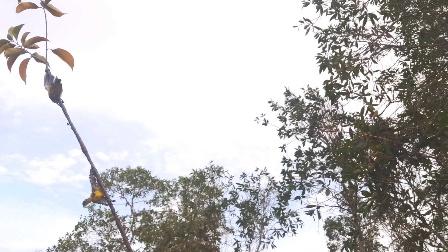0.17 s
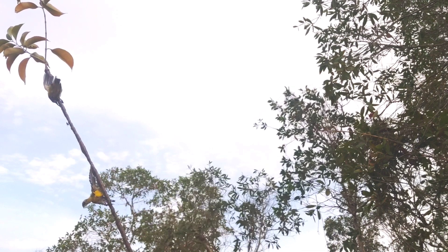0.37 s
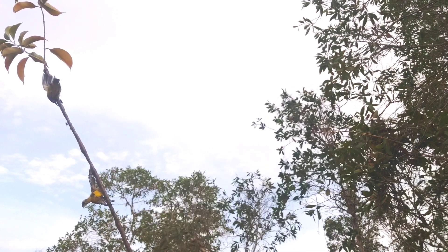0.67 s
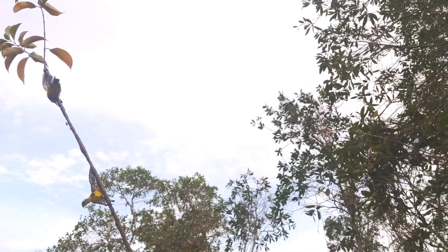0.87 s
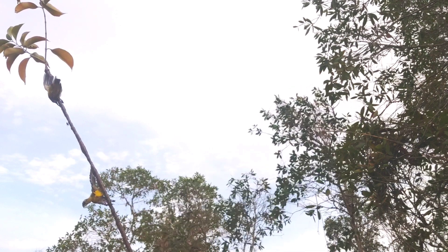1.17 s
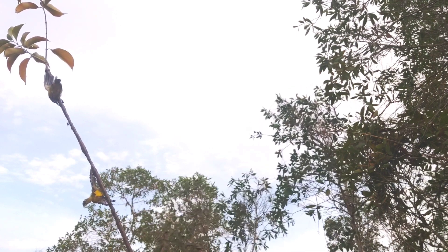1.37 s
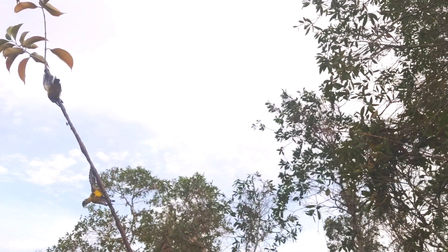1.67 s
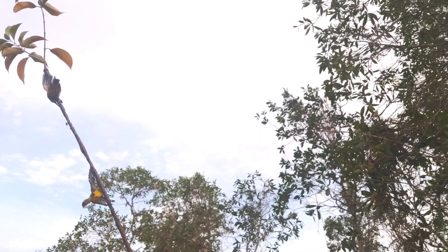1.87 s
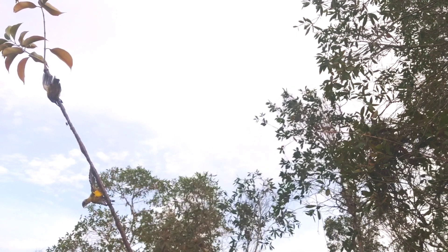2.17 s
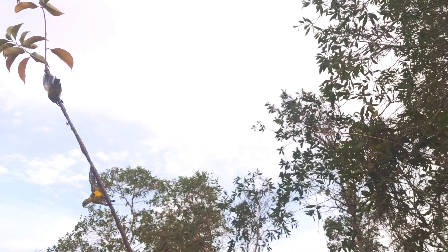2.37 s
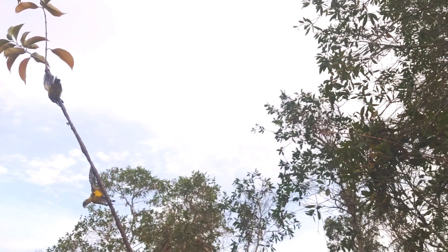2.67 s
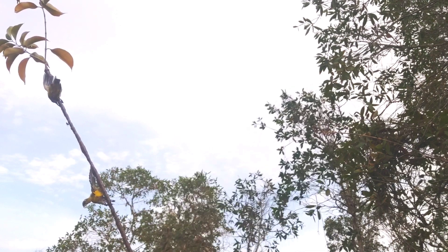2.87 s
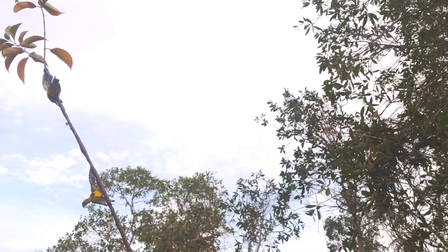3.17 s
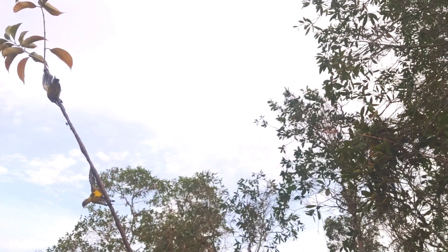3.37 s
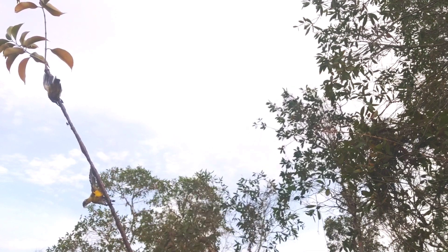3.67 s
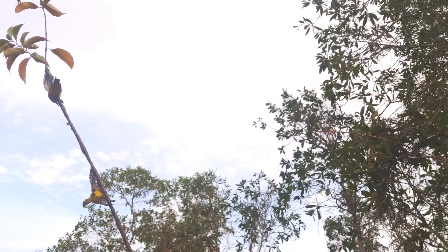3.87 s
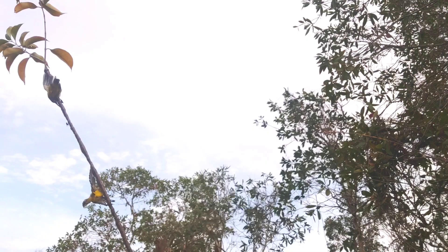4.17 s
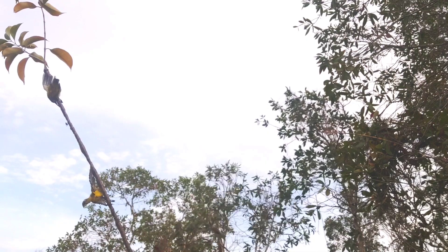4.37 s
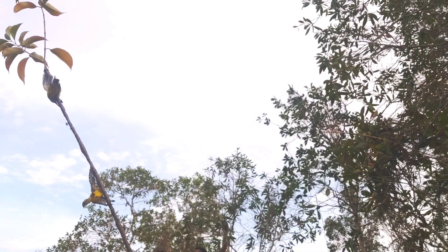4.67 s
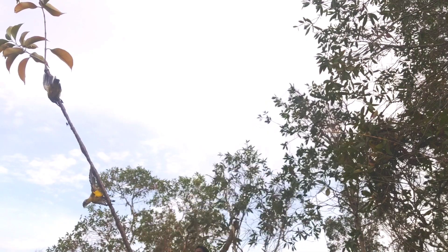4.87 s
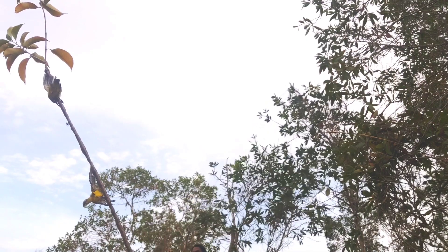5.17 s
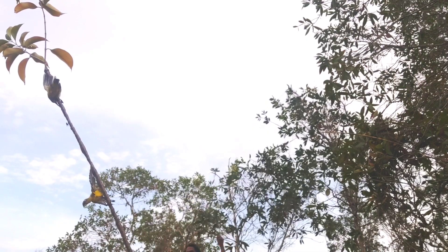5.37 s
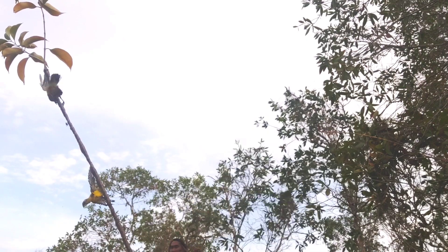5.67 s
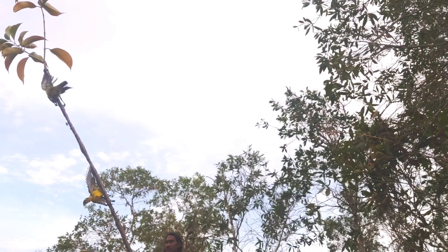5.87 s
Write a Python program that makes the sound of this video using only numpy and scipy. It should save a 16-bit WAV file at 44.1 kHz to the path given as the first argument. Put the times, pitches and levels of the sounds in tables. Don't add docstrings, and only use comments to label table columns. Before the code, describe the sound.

At a wood's edge, a single-cylinder motor revs briefly then drops to a soft low flutter, amid insect chirring, bird chips and snapping twigs.

```python
import sys
import numpy as np
from scipy import signal
from scipy.fft import rfft, irfft, next_fast_len
from scipy.io import wavfile
from scipy.ndimage import uniform_filter1d

SR = 44100
rng = np.random.default_rng(int(sys.argv[2]) if len(sys.argv) > 2 else 0)


def put_to_file(sound):
    columns = np.atleast_2d(sound).T
    safe = np.clip(columns, -1, 1)
    whole_steps = np.round(safe * 32767)
    wavfile.write(sys.argv[1], SR, whole_steps.astype(np.int16))


def invert_db(x):
    u = np.asarray(x, float) / 20
    return 10 ** u


N = 265967


def evened(x):
    return x / np.sqrt(np.mean(x ** 2) + 1e-20)


def read(points, hz):
    f, value = np.transpose(points)
    return np.interp(np.log(hz + 1), np.log(f + 1), value)


def curve(rows, column, t):
    rows = np.array(rows)
    return np.interp(t, rows[:, 0], rows[:, column])


def add(mix, s, sound):
    part = mix[..., max(round(s * SR), 0):][..., :sound.shape[-1]]
    part += sound[..., :part.shape[-1]]


def delayed(x, count):
    return np.roll(x, count, axis=-1)


def resonate(x, hz, width_hz):
    r = np.exp(-np.pi * width_hz / SR)
    return signal.lfilter([1 - r], [1, -2 * r * np.cos(2 * np.pi * hz / SR), r * r], x)


def wander(per_s):
    knots = rng.standard_normal(400)
    return np.interp(np.arange(N) / SR * per_s, np.arange(400), knots)


def coloured(x, spectrum):
    size = next_fast_len(N)
    gain = invert_db(read(spectrum, np.fft.rfftfreq(size, 1 / SR)))
    return irfft(rfft(x, size) * gain, size)[..., :N]


def beats(runs):
    return np.array([(s, db) for first, last, period, db in runs
                     for s in np.arange(first, last + period / 2, period)])


# (frequency [Hz], decay by 60 dB [s])
TRUNK_DECAY = [(3000, 0.74), (8000, 0.23)]


def echoes(x, wet_db):
    taps = rng.choice([-1., 1.], (2, SR // 2)) * (rng.random((2, SR // 2)) < .05)
    hz, t, z = signal.stft(taps, SR, nperseg=256)
    decay = invert_db(-60 * t / read(TRUNK_DECAY, hz)[:, None])
    tail = signal.istft(z * decay, SR, nperseg=256)[1]
    tail[:, :300] = 0
    return invert_db(wet_db) * signal.fftconvolve(x[None], tail / np.linalg.norm(tail[0]), axes=1)[:, :N]


# (frequency [Hz], level [dB per Hz])
AIR_COLOUR = [(18, -8.5), (35, -3.5), (65, -0.5), (110, -4.5), (170, -10), (280, -18), (450, -24.5),
              (650, -36.5), (1000, -45), (2500, -35), (4200, -36), (7000, -47), (11000, -39), (15000, -41)]
# (frequency [Hz], left minus right [dB])
AIR_LEAN = [(3000, -.5), (5000, 0), (7000, -4), (11000, -1.5)]
# (frequency [Hz], correlation [1])
AIR_LIKENESS = [(60, 1), (130, 0.94), (250, 0.9), (450, 0.56), (750, 0.33), (1200, .01), (15000, 0.0099)]
# (time [s], level [dB])
TRAFFIC_SWELL = [(0, -55), (.59, -53), (1.39, -54.5), (2.37, -52), (3.44, -55.5), (3.81, -54),
                 (4.21, -55.5), (5.44, -54), (6.03, -53.5)]


def air(level_db=-51.5, patchy_db=0.82):
    frames, hz = N // 256 + 5, np.fft.rfftfreq(1024, 1 / SR)
    a, b, c, d, patches = rng.standard_normal((frames, 513, 5)).T
    patches = evened(uniform_filter1d(uniform_filter1d(patches, size=10, axis=0), size=12, axis=1))
    same = np.clip(read(AIR_LIKENESS, hz), -1, 1)[:, None]
    left = a + 1j * b
    right = same * left + np.sqrt(1 - same ** 2) * (c + 1j * d)
    lean_db = read(AIR_LEAN, hz)[:, None] / 2
    z = np.array([left * invert_db(lean_db), right * invert_db(-lean_db)])
    traffic_db = curve(TRAFFIC_SWELL, 1, (np.arange(frames) - 2) * 256 / SR + 512 / SR)
    bass = 1 / (1 + (hz[:, None] / 350) ** 2)
    swell_db = bass * (traffic_db - traffic_db.mean())
    z *= invert_db(read(AIR_COLOUR, hz)[:, None] + patchy_db * patches + swell_db)
    return invert_db(level_db) * evened(signal.istft(z, nperseg=1024, noverlap=768)[1][:, :N])


# (pitch [Hz], width [Hz], left level [dB], right level [dB], throbs [per s])
CICADA_VOICES = [(7465, 170, -72.5, -63, 14), (7800, 760, -66, -63, 18), (8840, 670, -66.5, -64, 10),
                 (9280, 970, -64, -65, 5.2), (5400, 670, -73.5, -70, 14), (6400, 2300, -74.5, -71, 28)]
# (time [s], level [dB])
CHORUS_SWELL = [(0.0, -62), (0.47, -61.5), (1.44, -62), (2.01, -60.5), (2.4, -61), (4.2, -60), (5.19, -60),
                (5.46, -60.5), (5.66, -60.5), (6.03, -59.5)]


def cicadas(clicks_per_s=2500, spread_db=0.5, throb_db=1.0, drift_db=2.0):
    t, out = np.arange(N) / SR, np.zeros((2, N))
    for hz, width_hz, left_db, right_db, per_s in CICADA_VOICES:
        clicks = (rng.random((2, N)) < clicks_per_s / SR) * invert_db(spread_db * rng.exponential(1, (2, N)))
        ring = resonate(resonate(clicks - clicks.mean(), hz, width_hz), hz, width_hz)
        throb = np.sin(2 * np.pi * per_s * t + wander(3.6))
        sides_db = np.array([[left_db], [right_db]])
        out += evened(ring) * invert_db(sides_db + throb_db * throb + drift_db * wander(4.83))
    level_db = curve(CHORUS_SWELL, 1, t)
    return out * invert_db(level_db - level_db.mean())


# (middle [s], half length [s], rustle level [dB], scuff against it [dB])
LEAF_STIRS = [(.04, .1, -68.5, -16), (.32, .11, -67.5, -22), (.62, .17, -70.5, -16), (.91, .06, -71, -10),
              (1.2, .17, -69, -10), (1.8, .3, -76, -13), (2.2, .03, -65, -19), (2.69, .02, -73, -25),
              (2.76, .018, -70, -19), (3.92, .07, -65.5, -16), (4.05, .07, -62.5, -21),
              (4.28, .16, -71, -16), (4.97, .13, -71, -18), (5.86, .2, -65.5, -19), (5.37, .19, -62.5, -19),
              (5.6, .06, -56.5, -17)]


def stirring(t, blunt=3.1, calm_db=-76, calm_scuff_db=-13):
    rustle, scuff = invert_db(calm_db) ** 2, invert_db(calm_db + calm_scuff_db) ** 2
    for s, half, db, scuff_db in LEAF_STIRS:
        swell = invert_db(db) ** 2 * np.exp(-abs((t - s) / half) ** blunt)
        rustle = rustle + swell
        scuff = scuff + swell * invert_db(scuff_db) ** 2
    return 10 * np.log10(rustle), 10 * np.log10(scuff / rustle)


# (frequency [Hz], level [dB])
CRACKLE_LEFT = [(3000, -21.5), (4700, -11.5), (5600, -13.5), (7000, -20), (9500, -8.5), (12500, -6),
                (15000, -8.5)]
# (frequency [Hz], level [dB])
CRACKLE_RIGHT = [(3000, -19), (4700, -10), (5600, -12), (7200, -8.5), (9500, -11.5), (12500, -44),
                 (15000, -45)]
# (frequency [Hz], level [dB])
SCUFF_COLOUR = [(250, -14), (600, 0), (1500, 0), (2200, -5), (3500, -6), (4300, -13), (4800, -22),
                (9000, -35)]


def leaves(grains_per_s=14000, spread_db=2.02, steep=1.09, flutter_db=0.9):
    grains = (rng.random((3, N)) < grains_per_s / SR) * rng.standard_normal((3, N))
    grains *= invert_db(spread_db * rng.exponential(1, (3, N)))
    rustle_db, scuff_db = stirring(np.arange(N) / SR)
    grains = evened(grains) * invert_db(-67 + steep * (rustle_db + 73) + flutter_db * wander(60))
    crackle = np.array([coloured(grains[0], CRACKLE_LEFT), coloured(grains[1], CRACKLE_RIGHT)])
    scuff = coloured(grains[2], SCUFF_COLOUR) * invert_db(scuff_db)
    return invert_db(13.5) * (crackle + np.array([scuff, delayed(scuff, count=2)]))


def load(first_s=.031, shut_s=1.3, start_per_s=10.40, gain_per_s2=4.972):
    k = np.arange(18)
    s = first_s + (np.sqrt(start_per_s ** 2 + 2 * gain_per_s2 * k) - start_per_s) / gain_per_s2
    db = -32 - 3 * np.exp(-s / 0.46) + 0.5 * rng.standard_normal(len(k))
    t = np.arange(N) / SR
    idle_db, start_db, load_db, fade_s = -77, 2.5, 5, 0.74
    pulling_db = start_db + (load_db - start_db) * (t / shut_s) ** 2
    fading_db = load_db * np.exp((shut_s - t) / fade_s)
    return zip(s, db), idle_db + np.where(t < shut_s, pulling_db, fading_db)


# (frequency [Hz], level [dB per Hz])
EXHAUST_HISS = [(400, -11), (800, -0.5), (1150, 2.5), (1500, -2), (2100, -3), (3200, -4), (5000, -19.5)]
# (first beat [s], last beat [s], period [s], level [dB])
COASTING_RUNS = [(1.352, 2.636, .0642, -43), (2.715, 3.135, .084, -48), (3.222, 3.77, .0785, -42.5),
                 (3.83, 4.03, .066, -48), (4.1, 4.3, .068, -57), (4.368, 4.967, .0665, -47.5),
                 (5.045, 5.12, .072, -50), (5.195, 5.62, .071, -57), (5.687, 5.85, .078, -45),
                 (5.93, 6.02, .08, -54)]


def engine(hz=78, sag=0.89, rise_s=0.0042, lead_s=0.0096, clatter_db=-36, soft_hz=55, soft_s=0.0082):
    t = np.arange(2600) / SR
    turns = hz * 0.012 * (t / 0.012) ** sag
    swing = (t / rise_s) ** 2 * np.exp(-t / rise_s) * np.sin(2 * np.pi * turns)
    swing /= abs(swing).max()
    push = np.exp(-.5 * ((t - .03) / soft_s) ** 2)
    soft = push * np.cos(2 * np.pi * soft_hz * (t - .03) + 0.23)
    thumps, gate = np.zeros(N), np.zeros(N)
    blows, hiss_db = load()
    for s, db in blows:
        add(thumps, s - lead_s, invert_db(db + 1) * swing)
        add(gate, s - lead_s, invert_db(db) * (t / 0.0011) * np.exp(-t / 0.0061))
    coasting = beats(COASTING_RUNS)
    coasting += rng.standard_normal((len(coasting), 2)) * [0.0032, 1]
    for s, db in coasting:
        add(thumps, s - .03, invert_db(db - 1.5) * soft)
    hiss = evened(coloured(rng.standard_normal((4, N)), EXHAUST_HISS))
    level = invert_db(hiss_db)
    direct = thumps + 0.85 * level * hiss[2] + invert_db(clatter_db) * gate * hiss[2]
    bounced = 0.59 * level * hiss[3]
    left = delayed(direct, count=21) * invert_db(-0.8) + bounced
    right = direct + delayed(bounced, count=19)
    return np.array([left, right]) + 0.67 * level * hiss[:2]


# (time [s], peak level [dB], brightest [Hz], below 5 kHz against the top [dB], crack [ms])
TWIG_SNAPS = [(0.06, -50, 12000, -29, 0.55), (.4472, -43, 11600, -30, 0.22), (.627, -56, 11000, -10, .5),
              (2.1878, -38.5, 12500, -20, 0.8), (2.691, -57, 11600, -22, .5), (2.758, -58, 10900, -20, .5),
              (3.878, -45.5, 9500, -13, 0.6), (3.9964, -40.5, 12000, -18, 0.6),
              (4.06, -51, 12900, -13, 0.46), (5.426, -47, 13000, -19, 0.55), (5.596, -46, 12500, -20, .4),
              (5.646, -49, 11700, -13, .5), (5.996, -49, 11100, -8, 0.43)]


def snaps(tail_s=.008, far_db=-10):
    t, out = np.arange(1200) / SR, np.zeros((2, N))
    for s, db, hz, low_db, crack_ms in TWIG_SNAPS:
        noise = rng.standard_normal((3, 1200))
        shape = np.exp(-1000 * t / max(crack_ms, .1)) + .06 * np.exp(-t / tail_s)
        crack = np.diff(noise[:2] + 4 * (t == 0), prepend=0)
        near = evened(resonate(crack[0], hz, 4000))
        far = invert_db(far_db) * evened(resonate(crack[1], 0.69 * hz, 3500))
        low = evened(resonate(noise[2], 3800, 3000))
        add(out, s, invert_db(db + 8) * shape * (np.array([near, far]) + invert_db(low_db - 1) * low))
    return out


# (first chirp [s], last chirp [s], period [s], level [dB])
CRICKET_BOUTS = [(.107, 1.29, .169, -55.5), (1.459, 2.304, .169, -54.2), (2.466, 3.134, .167, -55),
                 (3.308, 4.849, .1712, -54.6), (5.054, 5.892, .1675, -56)]


def cricket(hz=5620, strokes_per_s=79.5, stroke_s=0.002, fall_hz=40):
    t, dry = np.arange(-250, 250) / SR, np.zeros(N)
    for s, db in beats(CRICKET_BOUTS):
        for k, (lag, loud, pitch) in enumerate(rng.standard_normal((6, 3))):
            turns = (hz + 35 * pitch) * t - fall_hz * t ** 2 / (2 * 0.0049)
            stroke = np.exp(-.5 * (t / stroke_s) ** 2) * np.sin(2 * np.pi * turns)
            stroke_db = db + 0.5 + 0.57 * loud - 3.2 * (k == 0)
            add(dry, s + k / strokes_per_s + 0.00024 * lag + t[0], invert_db(stroke_db) * stroke)
    direct = dry * invert_db(np.array([[-11], [0.1]]))
    return direct + echoes(dry, -9) * invert_db(np.array([[-2], [0.1]]))


def birds(notes, left_db, right_db, wet_db, husk):
    dry, waver = np.zeros(N), evened(uniform_filter1d(rng.standard_normal(N), size=50))
    for s, length, *pitch_hz, db in notes:
        u = np.linspace(0, 1, round(length * SR))
        waver_hz = 120 + husk * max(pitch_hz[0] - pitch_hz[2], 0)
        bend_hz = np.polyval(np.polyfit([0, .5, 1], pitch_hz, 2), u)
        hz = bend_hz + waver_hz * waver[round(s * SR):][:len(u)]
        add(dry, s, invert_db(db - 1) * np.sin(np.pi * u) ** 0.21 * np.sin(2 * np.pi * np.cumsum(hz) / SR))
    dry *= invert_db(2.5 * wander(60))
    return dry * invert_db(np.array([[left_db], [right_db]])) + echoes(dry, wet_db)


# (time [s], middle pitch [Hz], fall [Hz], level [dB])
BIRD_CHIPS = [(.515, 5200, 1310, -57), (.53, 6400, 503, -49.5), (.57, 6100, 500, -69),
              (.70, 6500, 1100, -58), (.788, 6200, 980, -52.5), (.975, 6400, 900, -60),
              (1.075, 6200, 650, -54.5), (1.2, 6500, 800, -59), (1.335, 6300, 800, -59),
              (1.64, 6500, 1160, -49.5), (1.652, 4200, 536, -61), (1.675, 6200, 500, -72),
              (1.803, 6150, 1110, -49.5), (1.965, 6450, 1770, -52), (2.43, 6600, 700, -57),
              (2.443, 6050, 1710, -56), (2.968, 6480, 1700, -48.5), (2.983, 6320, 500, -55),
              (4.28, 6400, 1200, -53), (4.40, 6500, 1160, -52.5), (5.785, 6650, 300, -55)]
# (time [s], length [s], middle pitch [Hz], level [dB])
BIRD_TWEETS = [(.32, .035, 5630, -59), (.352, 0.032, 6430, -60), (0.38, 0.061, 6140, -56.5),
               (1.55, 0.026, 6400, -57), (1.785, 0.028, 6750, -55), (1.904, .034, 6410, -53.5),
               (1.942, .028, 7200, -50), (1.997, .029, 6220, -50), (2.035, 0.024, 6740, -60),
               (4.922, 0.017, 6450, -52.5)]
# (time [s], length [s], top pitch [Hz], level [dB])
BIRD_ARCHES = [(1.747, 0.043, 6670, -54.5), (1.75, 0.033, 4460, -59.5), (1.904, .041, 4570, -57.5)]


def twitter():
    notes = []
    for s, hz, fall_hz, db in BIRD_CHIPS:
        length = 0.015 * (1000 / fall_hz) ** 0.34
        notes.append((s, length, hz + .53 * fall_hz, hz, hz - 0.57 * fall_hz, db))
    for s, length, hz, db in BIRD_TWEETS:
        notes.append((s, length, 0.925 * hz, hz, 0.96 * hz, db))
    for s, length, hz, db in BIRD_ARCHES:
        notes.append((s, length, 0.81 * hz, hz, 0.85 * hz, db))
    return notes


# (time [s], length [s], middle pitch [Hz], level [dB])
FAR_WHISTLES = [(4.204, 0.087, 4960, -62), (4.51, 0.037, 4700, -65), (4.781, 0.03, 4820, -58),
                (4.839, .03, 3800, -62), (5.053, 0.038, 5000, -63.5), (5.088, .06, 4180, -69),
                (5.369, .14, 3910, -63.5), (5.675, 0.035, 4960, -60), (5.713, 0.039, 4490, -59),
                (5.981, .044, 4970, -60)]


def whistles():
    notes = []
    for s, length, hz, db in FAR_WHISTLES:
        half_fall_hz = 5130 * np.sqrt(length) / 2
        notes.append((s, length, hz + half_fall_hz, hz, hz - half_fall_hz, db))
    return notes


def scene():
    near_birds = birds(twitter(), -4.5, -2, -4.5, .3)
    far_bird = birds(whistles(), -6, -1.5, -5, .1)
    return air() + cicadas() + leaves() + engine() + snaps() + cricket() + near_birds + far_bird


# (frequency [Hz], threshold [standard deviations])
DROPOUT_RARITY = [(1500, 3.2), (2200, 1.5), (2700, .85), (4800, .85), (5300, 2.6), (6000, 2.2), (7000, 1.8),
                  (7400, 4), (9700, 4), (10300, 1.4), (14000, 2.1)]


def gated(x, depth_db=-40, spare_db=3):
    hz, t, z = signal.stft(x, SR, nperseg=1024, noverlap=768)
    power = uniform_filter1d(uniform_filter1d(abs(z) ** 2, size=4, axis=1), size=7, axis=2)
    level_db = 10 * np.log10(abs(power) + 1e-20)
    around_db = uniform_filter1d(uniform_filter1d(level_db, size=11, axis=1), size=35, axis=2)
    chance = rng.standard_normal((len(t), len(hz))).T
    chance = evened(uniform_filter1d(uniform_filter1d(chance, size=5, axis=0), size=9, axis=1))
    unlucky = chance < -read(DROPOUT_RARITY, hz)[:, None]
    cut = 1. * unlucky * (level_db < around_db + spare_db)
    cut = np.minimum(uniform_filter1d(cut, size=3, axis=2) * 2, 1)
    return signal.istft(z * invert_db(depth_db * cut), SR, nperseg=1024, noverlap=768)[1][:, :N]


def band_limit(x):
    return signal.sosfilt(signal.butter(12, 14200, fs=SR, output="sos"), x)


def record(dry):
    limit = signal.firwin(201, 14500, window=("kaiser", 4), fs=SR)
    mix = gated(signal.oaconvolve(dry, limit[None], "same"))
    return band_limit(mix)


dry = scene()
out = record(dry)
put_to_file(out)
```